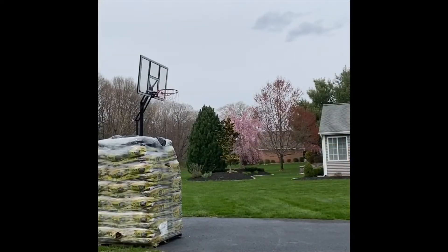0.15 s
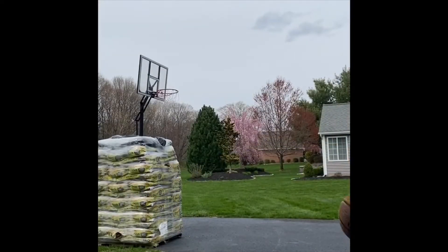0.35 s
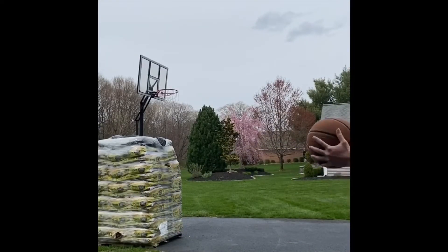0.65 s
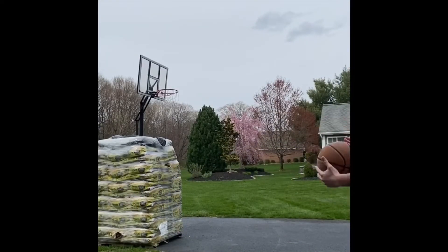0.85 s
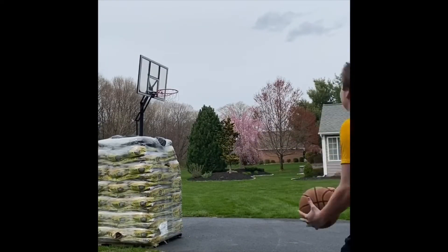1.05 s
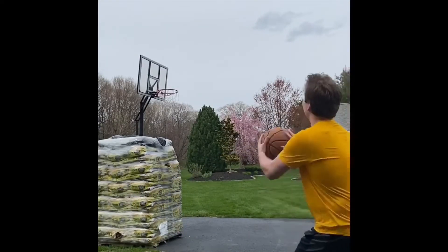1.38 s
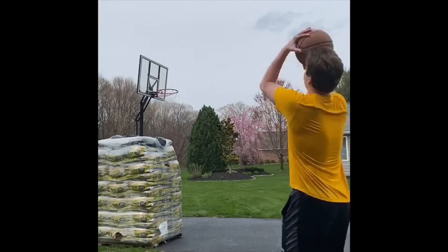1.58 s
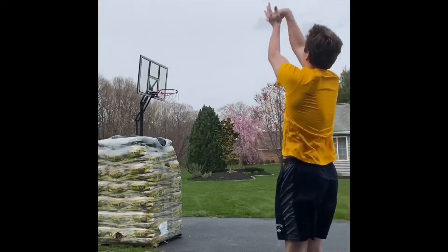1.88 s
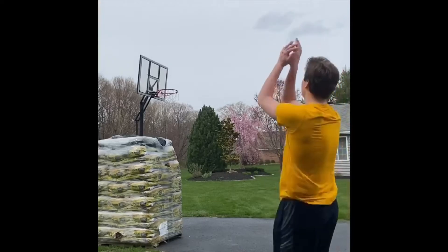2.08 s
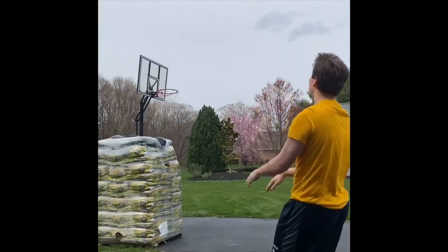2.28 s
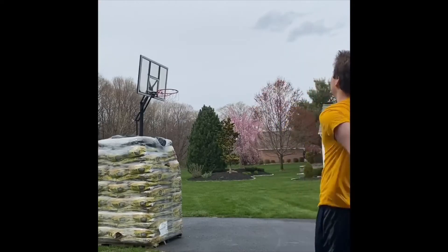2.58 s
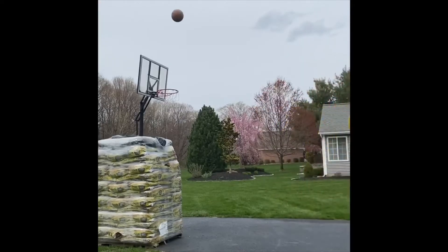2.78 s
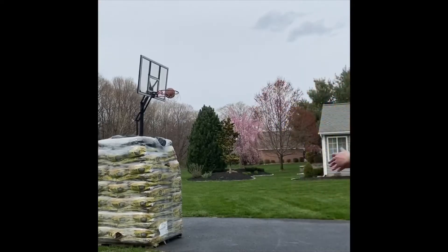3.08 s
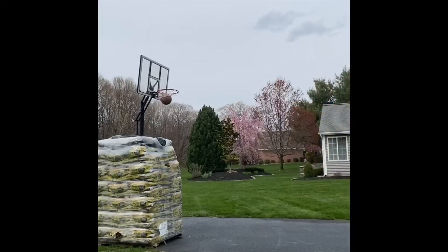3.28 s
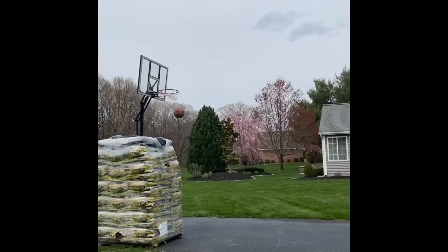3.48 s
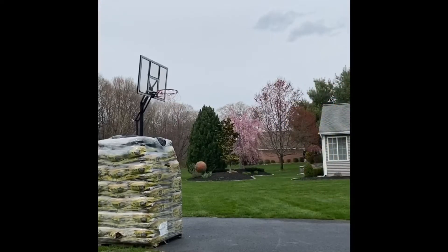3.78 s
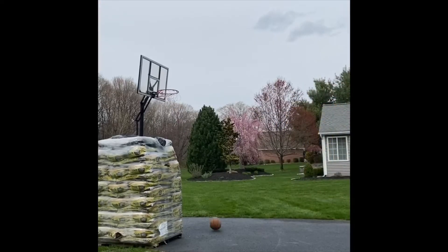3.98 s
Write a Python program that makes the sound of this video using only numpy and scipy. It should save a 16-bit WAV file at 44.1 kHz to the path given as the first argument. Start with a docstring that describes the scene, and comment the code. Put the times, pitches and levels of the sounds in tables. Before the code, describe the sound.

A stereo microphone in an open suburban yard picks up faint traffic hum and hiss. A hard, hollow ball slap rings out and echoes off houses and trees. Soft pats, gritty scuffs and a brief rubber chirp accompany the catch and jump. After a lull the hoop clatters loosely with small metallic ticks, low handling thuds rumble, and a weaker bounce lands at the end.

```python
"""A basketball bounces once on an asphalt driveway: slapping skin, a belly of air, ringing air inside.
The player catches it, steps with a shoe squeal, jumps and shoots: soft pushes and short strokes of grit.
The ball rattles backboard and rim, as clicks that set them ringing, and drops to the ground.
House fronts and trees return a diffuse tail of dying noise; dull thuds fall near the microphone.
Far traffic hums under a faint hiss, in banded noise, and a faint bird chirps in gliding sines."""
import sys
import numpy as np
from scipy import signal
from scipy.fft import rfft, irfft, next_fast_len
from scipy.io import wavfile
from scipy.ndimage import uniform_filter1d

SR = 44100
rng = np.random.default_rng(int(sys.argv[2]) if len(sys.argv) > 2 else 0)


def invert_db(level):
    """Linear amplitude ratio for a level in decibels (20 dB per decade), elementwise."""
    return 10 ** (np.asarray(level, dtype=float) / 20)


def put_to_file(sound):
    """Save the sound as 16-bit audio at rate SR, in the file named by the first command-line argument."""
    columns = np.atleast_2d(sound).T  # one column per channel
    safe = np.clip(columns, -1, 1)
    whole_steps = np.round(safe * 32767)
    wavfile.write(sys.argv[1], SR, whole_steps.astype(np.int16))


N = 182662   # length in samples

# Boom of the ground after a thud. Each row: mode in Hz, level in dB, t60 in seconds.
GROUND_MODES = [(65, -21, 0.11), (72.73, -18, 0.61), (111.9, -4.5, 0.046), (124, -28, 0.091),
                (186.7, -36, 0.25), (234.6, -22, 0.13), (316.4, -18.5, 0.18), (412, -14.5, 0.12),
                (466, -13, 0.08)]
CENTRES_HZ = 28 * 2 ** np.arange(0, 9.3, .5)   # half-octave bands of the diffuse sound


def curve(points, hz, column=1):
    """Reads a table column along log frequency."""
    p = np.array(points)
    return np.interp(np.log(hz + 1e-9), np.log(p[:, 0]), p[:, column])


def rms_one(x):
    """Scales to rms 1."""
    return x / np.sqrt(np.mean(x ** 2) + 1e-20)


def shaped(x, response):
    """Filters by a complex response given as a function of Hz."""
    size = next_fast_len(x.shape[-1] + SR)
    hz = np.arange(size // 2 + 1) * SR / size
    return irfft(rfft(x, size) * response(hz), size)[..., :x.shape[-1]]


def tilt_gain(hz, tilt_db):
    """Gain tilted by so many dB per octave about 2 kHz, flat below 150 Hz."""
    return invert_db(tilt_db * np.log2(np.maximum(hz, 150) / 2000))


def band(x, hz):
    """Half-octave band around hz."""
    edges = [hz / 2 ** .25, hz * 2 ** .25]
    return signal.sosfilt(signal.butter(2, edges, "band", fs=SR, output="sos"), x)


def drift(rate):
    """Slow random curve of rms 1; a higher rate wanders faster."""
    points = rng.standard_normal(int(N / SR * 60) + 2)   # 60 points a second
    slow = uniform_filter1d(points, size=max(1, int(30 / rate)))
    return np.interp(np.arange(N) * 60 / SR, np.arange(len(slow)), rms_one(slow))


def pair(count):
    """Mid and side white noise with a run-in of a quarter second."""
    return rng.standard_normal((count, 2, N + SR // 4))


def spread(mid, side, hz):
    """Left and right as alike as diffuse sound makes them: the less alike, the more side noise."""
    # Likeness of the two sides. Each row: frequency in Hz, left-right correlation.
    likeness = [(60, .995), (300, .93), (600, .4), (1500, .45), (3000, .6), (5500, .75), (7500, .97),
                (11000, .93), (15000, .93)]
    alike = np.clip(curve(likeness, hz), 0, 1)
    return np.sqrt((1 + alike) / 2) * mid + np.sqrt((1 - alike) / 2) * side * [[1], [-1]]


def ring(clicks, modes):
    """Clicks set every mode ringing: a two-pole resonator each, dying by 60 dB in its t60."""
    out = 0
    for hz, level_db, t60 in modes:
        radius, turn = invert_db(-60 / (t60 * SR)), 2 * np.pi * hz / SR
        poles = [1, -2 * radius * np.cos(turn), radius * radius]
        out = out + signal.lfilter([0, invert_db(level_db) * np.sin(turn)], poles, clicks + 1e-18)
    return out


def push(s, level_db, contact_ms):
    """A soft contact radiates the slope of its bell-shaped force; the level sets the peak."""
    u = (np.arange(N) / SR - s) * 1000 / contact_ms - 1
    return -invert_db(level_db) * u * np.exp(.5 - u ** 2 * 2) * 2


def force(s, level_db, contact_ms):
    """Bell-shaped force of a soft contact, its area set by the level."""
    u = (np.arange(N) / SR - s) * 1000 / contact_ms - 1
    bell = np.exp(-2 * u ** 2)
    return invert_db(level_db) * bell / bell.sum()


def air():
    """Far traffic hum and faint hiss as flickering bands of noise, plus a lumpy rumble that sets in late."""
    # Spectrum of hum and hiss. Each row: frequency in Hz, relative level in dB per Hz.
    wash_spectrum = [(20, -27), (45, 1), (75, 0.5), (110, -9.5), (175, -12), (320, -24.5), (660, -21),
                     (1000, -28.5), (1900, -34), (3300, -42.5), (6000, -45.5), (9500, -45.5), (12500, -68),
                     (16000, -75.5)]
    # The background's treble swells and sinks. Each row: time in seconds, change in dB.
    treble_swell = [(0, -1.5), (.8, -11.5), (1.1, 5), (1.7, -1), (1.95, -2.5), (2.2, 5), (2.4, -6),
                    (2.78, -2.5), (2.85, -12), (3.5, 6.5), (3.72, -4.5), (4.14, 0)]
    wash_db, together_db, flicker_db = -50, 0.31, 2
    rumble_from_s, rumble_db, rumble_db_per_s = 3.17, -43.5, 0.5
    white, together, wash, t = pair(count=2), drift(2.8), 0, np.arange(N) / SR
    swell_db = np.interp(t, *np.transpose(treble_swell))
    for k, hz in enumerate(CENTRES_HZ):
        share = np.clip(np.log2(hz / 700) / 2, 0, 1)   # the swell grows from 700 Hz to full at 2800 Hz
        level_db = curve(wash_spectrum, hz) + share * swell_db
        flicker = invert_db(level_db + together_db * together + flicker_db * drift(8))
        # neighbouring bands take different noise
        wash = wash + flicker * spread(*band(white[k % 2], hz)[:, -N:], hz)
    low = band(rng.standard_normal(N), 70.6) + 1.5 * band(rng.standard_normal(N), 42.3)
    since = t - rumble_from_s
    lumps = invert_db(rumble_db + rumble_db_per_s * since + 3 * drift(12))
    rumble = np.clip(since / .05, 0, 1) * lumps * rms_one(low)
    return invert_db(wash_db) * rms_one(wash) + rumble


def bounces():
    """Skin slaps twice with a puff of grit, the belly pushes air and rebounds, air and ground ring."""
    # Ball on asphalt. Each row: start in seconds, slap in dB, belly in dB, grit in dB over the slap,
    # tilt of slap and grit in dB per octave.
    landings = [(0.1959, -9, -2, -18.5, 2.5), (4.0626, -14.5, -8, -23, 0.5)]
    # Skin smacking the ground. Each row: frequency in Hz, relative level in dB per Hz.
    slap_spectrum = [(180, -43.5), (300, -11.5), (600, -1.5), (1200, -8), (2400, -16.5), (3300, -23.5),
                     (4300, -38.5), (5600, -42), (7500, -38.5), (10000, -48), (13000, -48), (16000, -62.5)]
    # Air inside the ball. Each row: mode in Hz, level in dB, t60 in seconds.
    inner_modes = [(794, -36, 0.36), (1033, -22.5, .1), (1610, -36.5, 0.099), (2000, -46.5, 0.033),
                   (2775, -43, .6)]
    slap_gain_db = 36
    second_slap_ms, second_slap_db, puff_s = 1.85, 0.5, 0.0098   # dB over the first slap; grit dies fast
    belly_late_ms = 1.0   # the ball flattens just after the skin touches
    rebound_ms, rebound_db = 5, -8.5   # after the touch; dB over the belly
    crack, slaps, belly, booms, t = 0, 0, 0, 0, np.arange(N) / SR
    grit = rng.standard_normal(N)
    for s, slap_db, belly_db, grit_db, tilt_db in landings:
        slap = np.zeros(N)
        slap[round(s * SR)] = invert_db(slap_db)
        slap[round((s + second_slap_ms / 1000) * SR)] = -invert_db(slap_db + second_slap_db)
        puff = (t > s) * invert_db(slap_db + grit_db) * np.exp(-np.maximum(t - s, 0) / puff_s) * grit
        skin = lambda hz: invert_db(curve(slap_spectrum, hz) + slap_gain_db) * tilt_gain(hz, tilt_db)
        crack = crack + shaped(slap + puff, skin)
        slaps = slaps + slap
        belly = belly + push(s + belly_late_ms / 1000, belly_db, contact_ms=2.8)
        # it springs back more slowly
        belly = belly + push(s + rebound_ms / 1000, belly_db + rebound_db, contact_ms=7.6)
        booms = booms + force(s, belly_db + 2.5, contact_ms=0.67)
    return crack + belly + ring(booms, GROUND_MODES) + ring(slaps, inner_modes)


def yard(x):
    """Scattered echoes of house fronts and trees: a near flutter and a long tail, noise dying by band."""
    # The long tail. Each row: frequency in Hz, level in dB (the flutter's too), t60 in seconds.
    tail = [(100, -11.5, 0.54), (200, -5.5, 0.5), (430, -8, 0.45), (800, -6.5, 0.46), (1600, -13.5, 0.72),
            (2880, -2.5, 0.53), (4500, -9.5, 0.64), (6500, -5.5, 0.21), (13000, -24, 0.93)]
    gap_ms, early_db, early_t60_s = 1.3, -10, 0.063
    dip_ms, dip_spread_ms, dip_db = 140, 3.3, -1   # the tail dips briefly
    clump_db = 1.0
    white, t, echoes = pair(count=2)[..., :SR], np.arange(SR) / SR, 0

    def dying(t60):
        """Decay of unit energy, so that t60 leaves the level alone."""
        return invert_db(-60 * t / t60) * np.sqrt(6 * np.log(10) / (t60 * SR))

    for k, hz in enumerate(CENTRES_HZ):
        onset = np.clip(t * 1000 / gap_ms, 0, 1) ** 2
        far = dying(max(curve(tail, hz, column=2), .1)) * onset
        close = invert_db(early_db) * dying(early_t60_s)
        noise = spread(*band(white[k % 2], hz), hz)
        echoes = echoes + invert_db(curve(tail, hz)) * (far + close) * noise
    dip = dip_db * np.exp(-((t * 1000 - dip_ms) / dip_spread_ms) ** 2)
    echoes = echoes * invert_db(dip + clump_db * drift(7.7)[:SR])   # echoes come in clumps
    return signal.fftconvolve(x[None], echoes, axes=1)[:, :N]


def thuds():
    """Dull pushes near the microphone; the booming ones wake the ground, the light knocks do not."""
    # Booming thuds of feet, catching hands and handling.
    # Each row: start in seconds, level in dB, contact in ms.
    booming = [(.412, -33.5, 1.03), (0.9839, -17.5, 0.9), (1.075, -34, 1.67), (1.1454, -17.5, 1.33),
               (1.38, -21.5, 2.54), (1.997, -26.5, 0.83), (2.02, -27.5, 1.26), (2.107, -30.5, 0.96),
               (2.901, -31.5, 8.2), (3.432, -34, 6.9), (3.468, -31, 1.28), (3.544, -18.5, 9.2),
               (3.657, -39.5, 6.9), (3.729, -24.5, 11.2), (3.736, -31, 3.33), (3.769, -29, 7.7),
               (3.875, -24.5, 13.5), (3.953, -23.5, 2.18), (3.96, -17.5, 11), (3.97, -19.5, 3.9),
               (4.01, -23.5, 7.1)]
    # Light knocks of toe, palm or ball that leave the ground still.
    # Each row: start in seconds, level in dB, contact in ms.
    knocks = [(0.97, -23.5, 1.25), (1.360, -19.5, 0.78), (2.035, -37.5, 2.9), (2.616, -34, 1.4),
              (3.16, -25, 4.7), (3.327, -23.5, 1.4)]
    boom_db, boom_db_per_ms = -9.5, 1.43   # a longer contact booms more
    out, booms = sum(push(*row) for row in booming + knocks), 0
    for s, level_db, contact_ms in booming:
        booms = booms + force(s, level_db + boom_db + boom_db_per_ms * contact_ms, contact_ms * 0.31)
    return out + ring(booms, GROUND_MODES)


def rubs():
    """Lumpy grit under a short stroke, brighter or duller by what rubs."""
    # Sound of the grit. Each row: frequency in Hz, relative level in dB per Hz.
    grit_spectrum = [(120, -54.5), (200, -5.5), (700, 0), (1300, 1), (2300, -5.5), (3000, -10.5),
                     (5200, -14), (7500, -11), (11300, -21.5), (13500, -18.5), (16000, -46.5)]
    # Soles and palms dragging. Each row: start in seconds, rms before the stroke's envelope in dB,
    # length in ms, tilt in dB per octave.
    drags = [(0.569, -37.5, 31.6, -0.5), (0.59, -39.5, 23, 0), (0.963, -30.5, 18.8, -5),
             (1.356, -22, 22.5, -1), (1.728, -62.5, 105, 3), (2.017, -47.5, 24.6, -0.5),
             (2.664, -54, 19, -3), (3.496, -44.5, 47.6, -8)]
    # Quick flicks of finger, toe or net. Each row: start in seconds, rms before the stroke's envelope
    # in dB, tilt in dB per octave.
    flicks = [(1.132, -47, -1), (1.144, -25, -4), (1.721, -40, -0.5), (1.901, -62.5, 14), (2.062, -48.5, 1),
              (2.103, -48.5, -2.5), (2.184, -54.5, 2), (2.615, -47.5, -9), (2.647, -56.5, -1.5),
              (2.713, -60, -1.5), (3.109, -48, -.5), (3.403, -45.5, -2.5)]
    drag_rise_share, drag_fall_ms = 0.39, 5.84   # the rise as a share of the length
    flick_rise_ms, flick_hold_ms, flick_fall_ms = 0.3, 1.33, 4
    out = np.zeros(N)
    grit = rng.standard_normal(N) * invert_db(2.0 * np.minimum(rng.exponential(1, N), 4))
    lumps = rms_one(uniform_filter1d(rng.standard_normal(N), size=90))
    grit = shaped(grit * invert_db(4.4 * lumps), lambda hz: invert_db(curve(grit_spectrum, hz)))
    strokes = [(s, db, tilt, drag_rise_share * ms, ms, drag_fall_ms) for s, db, ms, tilt in drags]
    flick_ms = flick_rise_ms + flick_hold_ms
    strokes += [(s, db, tilt, flick_rise_ms, flick_ms, flick_fall_ms) for s, db, tilt in flicks]
    ms = np.arange(8192) * 1000 / SR
    hz = np.arange(len(ms) // 2 + 1) * SR / len(ms)
    for s, level_db, tilt_db, rise_ms, length_ms, fall_ms in strokes:
        at = round(s * SR)
        stroke = np.minimum(ms / rise_ms, 1) * np.exp(-np.maximum(ms - length_ms, 0) / fall_ms)
        tilted = irfft(rfft(grit[at:at + len(ms)]) * tilt_gain(hz, tilt_db), len(ms))
        out[at:at + len(ms)] += invert_db(level_db) * stroke * rms_one(tilted)
    return out


def bird():
    """Thin rising whistles, sines under a smooth arch, their level roughened by distance."""
    # Each row: start in seconds, length in seconds, from Hz, to Hz, level in dB.
    chirps = [(.905, .06, 4750, 5150, -76), (1.055, .06, 4500, 4850, -69), (1.25, .04, 4800, 4850, -69)]
    out, t = 0, np.arange(N) / SR
    for s, length, from_hz, to_hz, level_db in chirps:
        u = np.clip((t - s) / length, 0, 1)
        cycles = length * (from_hz * u + (to_hz - from_hz) * u ** 2 / 2)
        out = out + invert_db(level_db) * np.sin(np.pi * u) * np.sin(2 * np.pi * cycles)
    return out * (1 + .7 * rms_one(uniform_filter1d(rng.standard_normal(N), size=200)))


def squeal():
    """Rubber slides to a stop: a rough stick-slip tone whose pitch drops with the sliding speed."""
    start_s, pitch_hz, level_db = 1.356, 2230, -26
    rise_ms, slide_ms, stop_ms = 2.1, 24, 15.8   # steady sliding, then braking to rest
    ms = (np.arange(N) / SR - start_s) * 1000
    speed = np.clip(1 - (ms - slide_ms) / stop_ms, 0, 1)
    grip = np.clip(ms / rise_ms, 0, 1) ** 2 * np.clip(4 * speed - .6, 0, 1)
    rough = rms_one(uniform_filter1d(rng.standard_normal(N), size=60))
    cycles = np.cumsum(pitch_hz * speed * (1 + 0.048 * rough)) / SR
    return invert_db(level_db) * grip * np.sin(2 * np.pi * cycles)


def hoop():
    """Each jolt ticks the rim and shakes loose joints and net: dense uneven clicks into board and rim."""
    # The rim jolts on its bracket. Each row: start in seconds, clatter in dB, tick in dB.
    jolts = [(3.151, -36, -67), (3.167, -31, -38.5), (3.173, -31.5, -51), (3.222, -36, -42.5),
             (3.239, -40, -60), (3.279, -37, -43), (3.299, -45.5, -58), (3.326, -43, -52.5),
             (3.380, -45, -54.5), (3.407, -51.5, -57.5)]
    # Clatter of joints and net. Each row: frequency in Hz, relative level in dB per Hz.
    clatter_spectrum = [(60, -55), (100, -2.5), (200, -19), (430, -8.5), (900, -15.5), (1500, -21),
                        (2900, -34.5), (6000, -35.5), (9200, -37.5), (13000, -48), (16000, -48)]
    # Backboard. Each row: mode in Hz, level in dB, t60 in seconds.
    board_modes = [(196, -8, 0.16), (335, -14.5, 0.17), (461, -9.5, 0.054), (825, -15.5, 0.12),
                   (1360, -30, 0.034)]
    # Steel rim. Each row: mode in Hz, level in dB, t60 in seconds.
    rim_modes = [(2600, -14, .09), (3350, -11, .09), (3950, -8, .05), (4300, -7, .06), (5050, -16, .05),
                 (6030, -7, .13), (6130, -9, .1)]
    rise_ms, fall_ms, clicks_per_s = 3.84, 35.7, 2000
    bright_db, dulls_db_per_s = 2, 22   # clatter above 1500 Hz: at the first jolt, and its loss from then on
    t, power, ticks = np.arange(N) / SR, 0, np.zeros(N)
    for s, clatter_db, tick_db in jolts:
        ms = np.maximum(t - s, 0) * 1000
        jolt = invert_db(clatter_db) * np.minimum(ms / rise_ms, 1) * np.exp(-ms / fall_ms)
        power = power + jolt ** 2
        ticks[round(s * SR)] = invert_db(tick_db)
    shake = np.sqrt(power)
    sizes = invert_db(5.6 * np.minimum(rng.exponential(1, N), 3.5))
    clicks = (rng.random(N) < clicks_per_s / SR) * sizes * rng.choice([-1, 1], N)
    clatter = rms_one(shaped(clicks, lambda hz: invert_db(curve(clatter_spectrum, hz))))
    dull = signal.sosfilt(signal.butter(1, 1500, fs=SR, output="sos"), clatter)
    bright = (clatter - dull) * invert_db(bright_db - dulls_db_per_s * np.maximum(t - jolts[0][0], 0))
    blows = invert_db(-22) * shake * rms_one(clicks)
    rings = ring(blows, board_modes) + ring(ticks + invert_db(-42) * blows, rim_modes)
    return shake * (dull + bright) + rings


def scene():
    """Near sounds reach the microphone directly and by way of the yard, over the far background."""
    # The ball throws more treble sideways than at the microphone.
    # Each row: frequency in Hz, gain in dB.
    sideways = [(2500, -2.5), (4500, 6), (6500, 2), (10000, 3.5)]
    background = air()
    ball, rest, squeak = bounces(), thuds() + rubs() + hoop(), squeal()
    sent = rest + invert_db(-14) * squeak + shaped(ball, lambda hz: invert_db(curve(sideways, hz)))
    return ball + rest + squeak + yard(sent) + bird() + background


def band_limit(x):
    """A steep low-pass at the top of the band."""
    return signal.sosfilt(signal.butter(12, 16800, fs=SR, output="sos"), x)


def record(dry):
    """The microphone cuts deep bass and delays the lows, so blows sweep down; its sides differ."""
    # Phase between the sides. Each row: frequency in Hz, left's lead in radians.
    left_lead = [(0, -.08), (420, -.2), (620, -1.2), (1400, -1.4), (2800, .8), (5400, .3), (7000, 3.1),
                 (8200, 3.3), (10000, 6.2), (11000, 6.3), (13000, 9.2), (14300, 9.6), (16400, 12.5)]
    # Level between the sides. Each row: frequency in Hz, left over right in dB.
    left_level = [(350, 0), (600, 1), (1200, 2.5), (2200, 0), (4300, -1.5), (5500, 0)]
    low_cut_hz, smear_turns, smear_hz, limit = 60.1, 1.6, 27.9, .95
    knots_hz, lead = np.transpose(left_lead)
    halves = np.array([[.5], [-.5]])   # each side takes half the difference

    def microphone(hz):
        """Gain and phase of left and right."""
        low_cut = 1 / np.sqrt(1 + (low_cut_hz / (hz + 1)) ** 8)
        smear = -2 * np.pi * smear_turns * np.log(1 + hz / smear_hz)
        phase = smear + np.interp(hz, knots_hz, lead) * halves
        return invert_db(curve(left_level, hz) * halves) * low_cut * np.exp(1j * phase)

    run_in = SR // 8
    running = np.pad(dry, [(0, 0), (run_in, run_in)], "reflect")   # the filters run before and after
    heard = shaped(running, microphone)[:, run_in:run_in + N]
    heard = np.clip(heard, -limit, limit)   # hard limit that keeps peaks in range
    return band_limit(heard)


dry = scene()
out = record(dry)
put_to_file(out)
```